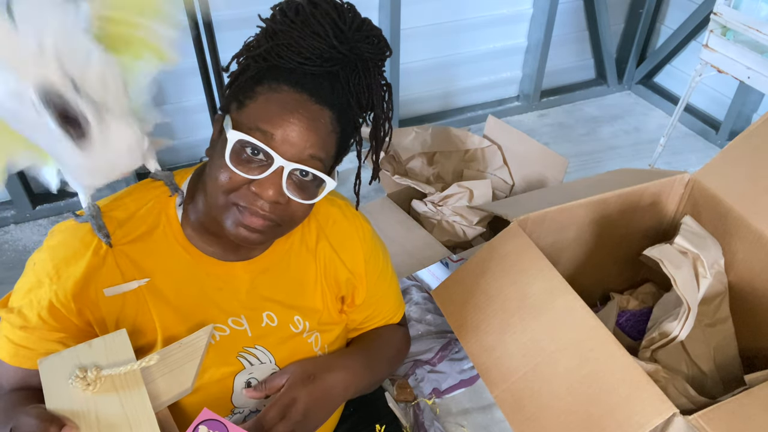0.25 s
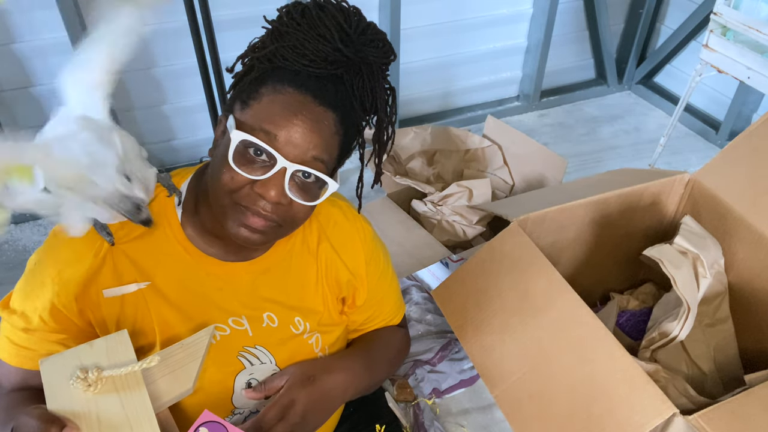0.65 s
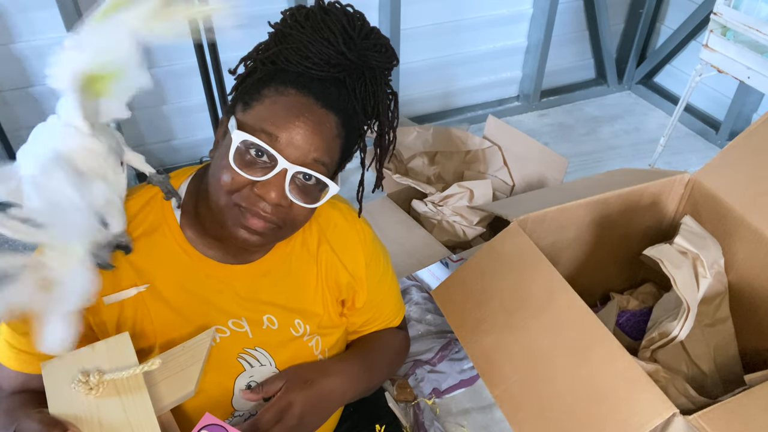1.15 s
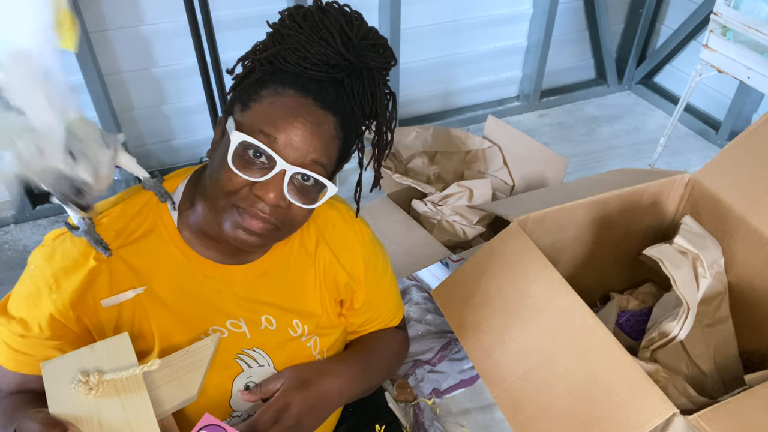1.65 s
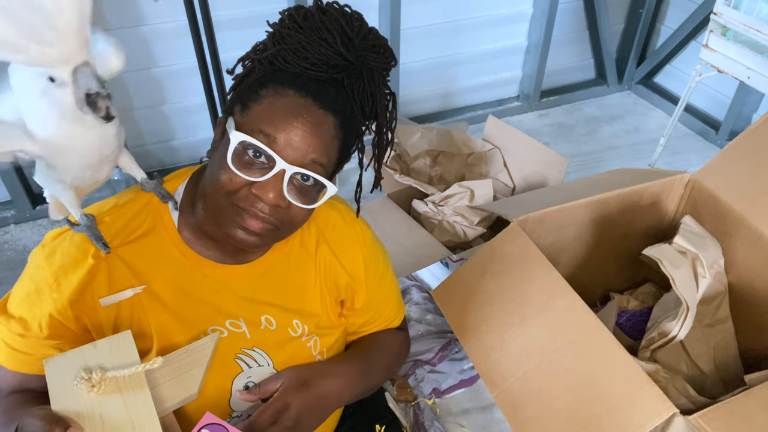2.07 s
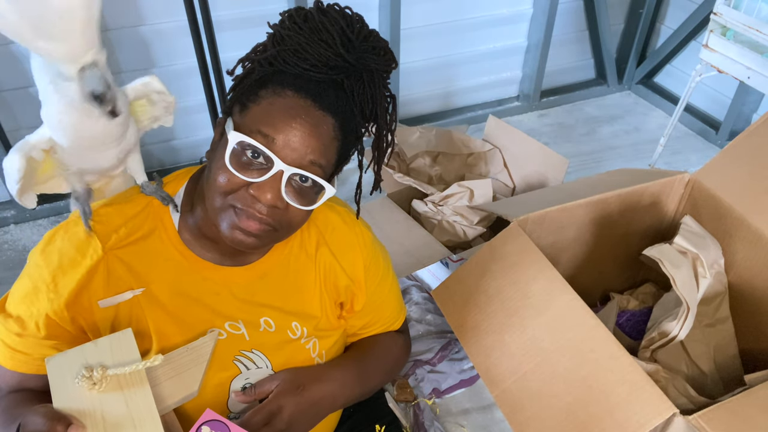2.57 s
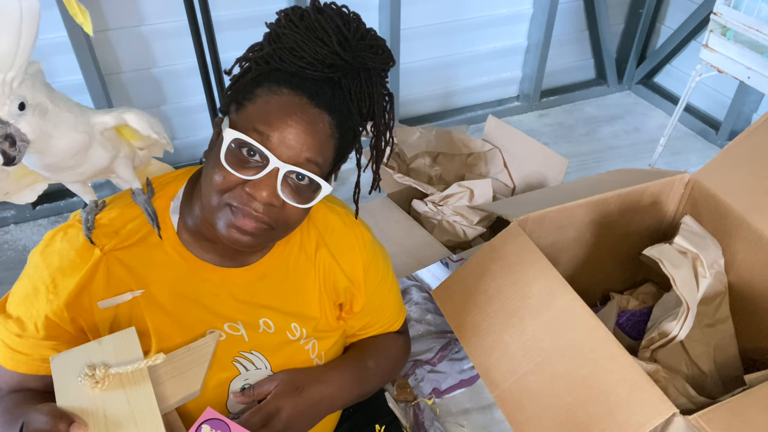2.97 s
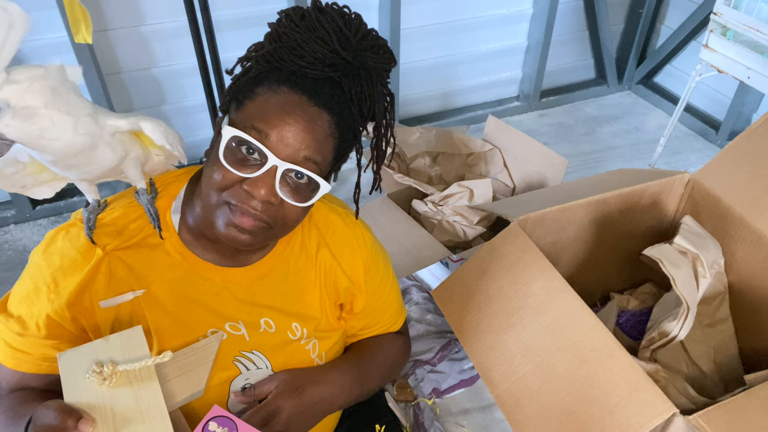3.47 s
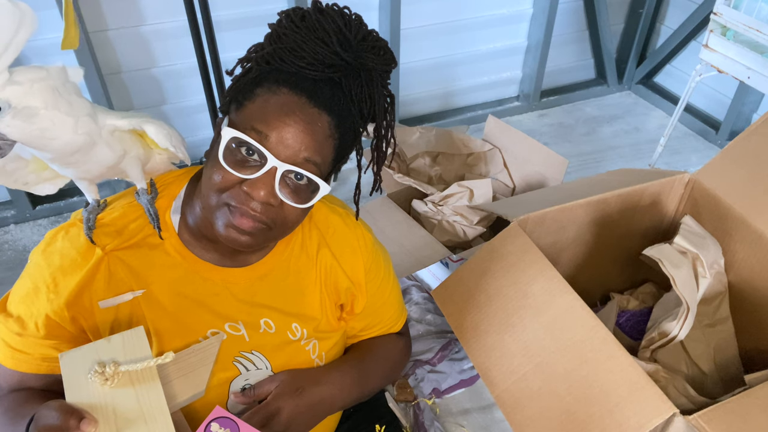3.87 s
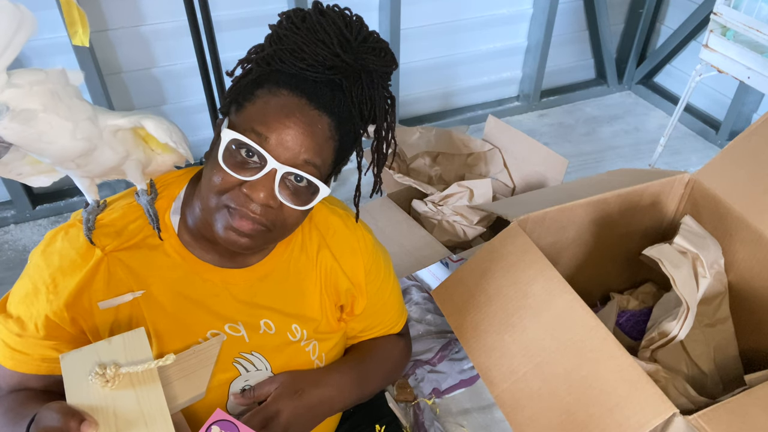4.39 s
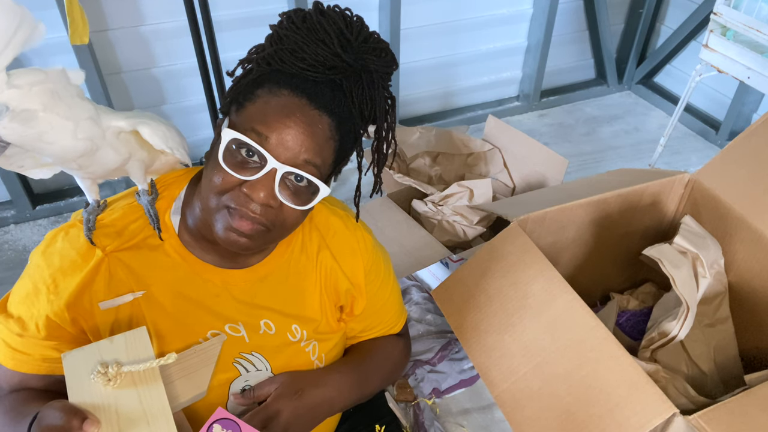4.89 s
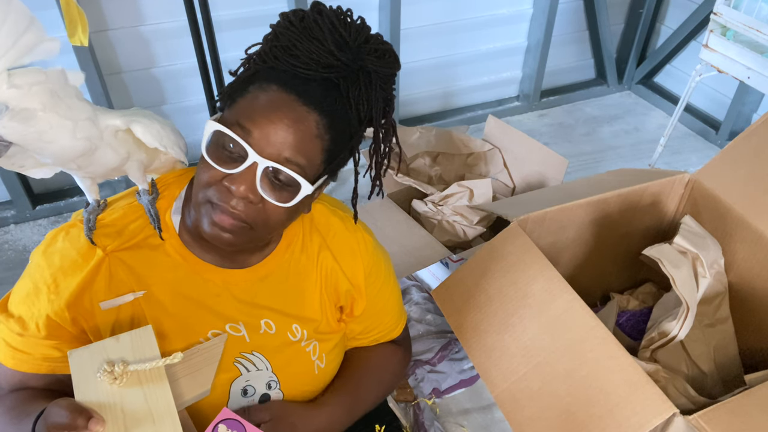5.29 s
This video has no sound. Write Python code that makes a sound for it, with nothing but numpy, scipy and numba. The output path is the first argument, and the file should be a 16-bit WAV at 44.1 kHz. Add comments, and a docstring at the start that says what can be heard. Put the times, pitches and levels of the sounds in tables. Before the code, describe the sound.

A big cockatoo close to the microphone beats its wings quickly for almost two seconds, with soft low thumps of air, rustling feathers and small snaps. One short whistle slips out, then five loud raspy screams follow with brief gaps, most breaking into a thin high whistle. The hard-walled room answers with dense short echoes; the loudest peaks distort, over a faint low hum.

```python
"""A large cockatoo screams five times close by in a hard-walled room, after flapping its wings and whistling once.
A scream starts as breath and turns into rough pulses near 1 kHz, at times with lines at half the pitch between.
Most screams end in a high, nearly pure whistle that flicks up or down to another pitch.
Wing beats are bursts of low air noise and rustling feathers; a faint hum lies under everything.
Early echoes and feedback delays make the room, and the loudest peaks are clipped."""
import sys
import numpy as np
from scipy import signal
from scipy.fft import rfft, irfft
from scipy.io import wavfile
from scipy.ndimage import uniform_filter1d, map_coordinates
from numba import njit

SR = 44100
rng = np.random.default_rng(int(sys.argv[2]) if len(sys.argv) > 2 else 0)


def waveform_to_disk(signal):
    """Save audio, clipped to [-1, 1], as 16-bit WAV at the path in sys.argv[1]."""
    frames = np.transpose(np.atleast_2d(signal))
    scaled = np.clip(frames, -1, 1) * 32767
    samples = np.round(scaled).astype(np.int16)
    wavfile.write(sys.argv[1], SR, samples)


N = 244225
T = np.arange(N) / SR


def undb(db):
    """Turn decibels into a gain."""
    return 10 ** (np.asarray(db) / 20)


def gain_at(shape, hz):
    """Gain of a table of (f/Hz, level/dB), almost silent outside its ends."""
    f, db = np.transpose(shape)
    return undb(np.interp(np.log(hz + 1), np.log(f), db, left=-90, right=-90))


def noise(shape):
    """Noise of a given colour, rms 1."""
    even = N + N % 2
    spectrum = rfft(rng.standard_normal(even))
    x = irfft(spectrum * gain_at(shape, np.fft.rfftfreq(even, 1 / SR)))[:N]
    return x / np.std(x)


def walk(rate):
    """Smooth random wandering that changes about rate times a second, spread 1."""
    k = int(SR / rate)
    x = uniform_filter1d(uniform_filter1d(rng.standard_normal(N), k), k)
    return x / np.std(x)


def play(tables, fade_s):
    """Columns of all tables over time, and a gate that is open while a table lasts."""
    s, *columns = np.transpose(np.concatenate(tables))
    gate = 0
    for t in tables:
        to_edge = np.minimum(T - t[0][0] + fade_s, t[-1][0] + fade_s - T)
        gate = gate + np.clip(to_edge / fade_s, 0, 1)
    return [np.interp(T, s, c) for c in columns], gate


def span(start, end, edge_s):
    """0 outside, 1 inside, with straight edges."""
    return np.clip(np.minimum(T - start, end - T) / edge_s, 0, 1)


def hump(s, length):
    """A smooth swell around s."""
    return np.exp(-(2 * (T - s) / length) ** 2)


def ring(hz, centre_hz, width_hz):
    """Bell-shaped resonance, 1 at the centre."""
    return 1 / (1 + (2 * (hz - centre_hz) / width_hz) ** 2)


def band(centre_hz, width_hz):
    """Noise around a centre that may move: two wandering levels on a cosine and a sine."""
    phase = 2 * np.pi * np.cumsum(centre_hz + 0 * T) / SR
    return walk(width_hz) * np.cos(phase) + walk(width_hz) * np.sin(phase)


# colour of the hum: f/Hz, level/dB
HUM_COLOUR = [(20, -21), (97, -1.5), (226, -15), (255, -13.5), (700, -29.5), (910, -86.5)]


def hum():
    """Steady low noise, partly shared by both ports and partly different in each."""
    return undb(-56) * (noise(HUM_COLOUR) + .5 * np.array([noise(HUM_COLOUR), noise(HUM_COLOUR)]))


BEAT_RISE_S, BEAT_FALL_S = 0.024, 0.1
FOLD_S, FOLD_FADE_S = 1.88, 0.4  # the wings come to rest
# wing beats: t/s, thump of air level/dB, rustle of feathers level/dB
WING_BEATS = [(.225, -45, -54.5), (0.365, -42, -48.5), (.45, -47, -50), (0.499, -43.5, -46),
              (.6, -46.5, -51), (0.753, -45, -46), (0.847, -42, -47), (1.022, -42, -54.5),
              (1.13, -54, -50.5), (1.28, -39.5, -48), (1.426, -45.5, -49), (1.554, -43, -50.5),
              (1.689, -42.5, -48.5)]


def beats(column, stir_db):
    """Quick rise and slower fall at each beat, over the steady stir of half-open wings."""
    power = undb(2 * stir_db)
    for row in WING_BEATS:
        t = T - row[0]
        shape = np.where(t < 0, np.exp(-(t / BEAT_RISE_S) ** 2), np.exp(-np.abs(t) / BEAT_FALL_S))
        power = power + (undb(row[column]) * shape) ** 2
    return np.sqrt(power) * np.clip(1 - (T - FOLD_S) / FOLD_FADE_S, 0, 1)


# colour of the pushed air: f/Hz, level/dB per Hz
AIR_COLOUR = [(20, -38), (48, 12.5), (98, 9), (295, 1.5), (392, -7), (700, -15.5), (910, -39.5)]
# colour of rustling and snapping feathers: f/Hz, level/dB per Hz
FEATHER_COLOUR = [(240, -10), (400, -4.5), (1000, -9.5), (2000, -9), (4500, -13.5), (7000, -14),
                  (9500, -20.5), (14500, -25), (15500, -88)]


def wings():
    """Beats push air, mostly alike at both ports; feathers rustle in fine grains and differ more."""
    push = beats(column=1, stir_db=-54.5) * undb(3.0 * walk(25))
    air = push * (noise(AIR_COLOUR) + 0.34 * np.array([noise(AIR_COLOUR), noise(AIR_COLOUR)]))
    grain = beats(column=2, stir_db=-54.5) * undb(0.98 * walk(100))
    near = grain * noise(FEATHER_COLOUR)
    wide = grain * np.array([noise(FEATHER_COLOUR), noise(FEATHER_COLOUR)])
    return near, air + 1.505 * wide


# short cracks: t/s, peak level/dB
FEATHER_SNAPS = [(0.4354, -28), (0.5901, -33), (0.8385, -25), (1.3897, -29)]


def snaps():
    """Short cracks of stiff feathers: noise that starts at once and dies within milliseconds."""
    size = sum(undb(db) * np.exp(-np.maximum(T - s, 0) / 0.0012) * (T >= s) for s, db in FEATHER_SNAPS)
    return noise(FEATHER_COLOUR) * size


# one duller rustle: t/s, length/s, level/dB
DULL_RUSTLE = (1.272, 0.11, -37)
# its colour: f/Hz, level/dB per Hz
DULL_RUSTLE_COLOUR = [(400, -17), (700, -1.5), (1500, 0), (2200, 5)]


def scuff():
    """A duller rustle: one swell of noise with an uneven level."""
    s, length, db = DULL_RUSTLE
    return undb(db + 2.8 * walk(56)) * hump(s, length) * noise(DULL_RUSTLE_COLOUR)


GLIDE_LOSS_DB = -13  # the whistle thins out in mid-glide
FLIP_WOBBLE = .016  # unsteadiness of the pitch in the other register, as a share
# flips to another register and back: start t/s, end t/s, f/Hz, level/dB, glide there/s, glide back/s
REGISTER_FLIPS = [(2.342, 2.377, 4312, -12.5, 0.0097, 0.0041), (2.383, 2.4, 3510, -1.5, 0.0071, .012),
                  (2.892, 2.938, 2824, -0.5, 0.01, 0.015), (3.005, 3.041, 4335, -20, 0.0047, .016),
                  (3.137, 3.183, 2896, -34, 0.0077, .01), (4.241, 4.3, 2886, -2.5, 0.0109, 0.0139),
                  (4.339, 4.398, 4850, -21, 0.01434, 0.014), (4.489, 4.515, 2826, -12.5, 0.0087, .01),
                  (5.144, 5.198, 5150, -11.5, 0.0083, 0.00806), (5.301, 5.397, 2915, -28, 0.0099, 0.013)]


def flips(hz, db):
    """Glide from the held pitch and level to those of each flip; the held pitch stays once it has sounded."""
    first_s = np.array([w[0][0] for w in WHISTLE_CURVES])
    wobble, away = 1 + FLIP_WOBBLE * walk(150), 0
    for start, end, to_hz, to_db, there_s, back_s in REGISTER_FLIPS:
        on = np.clip(np.minimum((T - start) / there_s, (end - T) / back_s), 0, 1)
        hz = hz + on * (to_hz * wobble - hz)
        db = db + np.sqrt(on) * (to_db - db) + GLIDE_LOSS_DB * np.sin(np.pi * on) ** 2
        already_sounding = start > first_s[np.searchsorted(first_s, end) - 1]
        away = np.maximum(away, on * already_sounding)
    return hz, db, away


PIPE_HZ, PIPE_WIDTH_HZ = 3750, 650  # windpipe resonance that carries the whistle
HELD_DB = -8  # the other side of the voice box keeps the held pitch through a flip
THROB_HZ, THROB = 85, .32  # mean rate of the uneven throb; its depth before the random swing
# held pitch, one curve a whistle: t/s, f/Hz, level/dB before the windpipe weakens it
WHISTLE_CURVES = [
    [(1.562, 3430, -20), (1.58, 3568, -13.5), (1.605, 3505, -13), (1.64, 3337, -18), (1.65, 3520, -28)],
    [(2.18, 3650, -10.5), (2.195, 3870, -4), (2.225, 3970, -4.5), (2.245, 3767, -18), (2.29, 3680, -8.5),
     (2.345, 3767, -5), (2.388, 3727, -21)],
    [(2.915, 3850, -8.5), (2.955, 3850, -10), (3.046, 3618, -10), (3.078, 3860, -9), (3.105, 3996, -9.5),
     (3.15, 3862, -11)],
    [(4.272, 3960, -17.5), (4.336, 3976, -13), (4.39, 3791, -6.5), (4.42, 3827, -13), (4.46, 3790, -13.5),
     (4.5, 3796, -28)],
    [(5.09, 3840, -21), (5.12, 3877, -18), (5.146, 3962, -13.5), (5.203, 3800, -11.5), (5.235, 3826, -18),
     (5.255, 3873, -12), (5.32, 3936, -9), (5.39, 3885, -26)],
]
# second to fourth multiple of the pitch: level/dB before they follow the loudness
OVERTONES = [-17.5, -38, -48.5]


def whistles():
    """A nearly pure tone with weak overtones; it fades as it flips away from the windpipe resonance."""
    (hz, db), gate = play(WHISTLE_CURVES, fade_s=0.0052)
    throb_phase = 2 * np.pi * np.cumsum(THROB_HZ * (1 + walk(30.3) / 4)) / SR
    throb = 1 + THROB * np.clip(.5 + walk(4), 0, 2) * np.sin(throb_phase)
    held = undb(db + HELD_DB) * np.sin(2 * np.pi * np.cumsum(hz) / SR)
    hz, db, away = flips(hz, db)
    phase = 2 * np.pi * np.cumsum(hz * (1 + 0.0028 * walk(120))) / SR
    pipe = 1 / np.sqrt(1 + ((hz - PIPE_HZ) / PIPE_WIDTH_HZ) ** 4)
    size = undb(db + 2.2 * walk(75)) * pipe * throb
    overtones = 0
    for k, overtone_db in enumerate(OVERTONES):
        # overtones grow faster than the tone itself
        growth = (1.87 * np.abs(size) * pipe) ** (k + 1)
        overtones = overtones + undb(overtone_db + 0.26 * walk(240)) * growth * np.sin((k + 2) * phase)
    return gate * (size * (np.sin(phase) + overtones) + away * throb * held)


HALF_AT_REST, TURN_S = 0.0094, 0.018  # half lines outside the stretches below; time to switch
BRIGHT_DB_PER_DB, NEUTRAL_DB = 0.29, -20.5  # louder is brighter: dB per octave for each dB; neutral level
LOW_HZ, LOW_WIDTH_HZ = 1109, 345  # low throat resonance
# voice of each scream: roughness 0-1, extra roughness of the breathy start, time until the start clears/s,
# fundamental against the scream level/dB, brightness/dB per octave, ring of the focus level/dB
SCREAM_VOICES = [(.2, .5, .06, -18, -1.5, 12.5), (0.67, 0.24, 0.12, -38, 0, 9.5),
                 (0.17, 0.75, 0.04177, -18, 0, 2.5), (.22, 0.3283, 0.021, -16, -1.5, 1),
                 (.28, 0.6207, 0.084, -32.5, 2, 6.5)]
# strong-weak cycles: start t/s, end t/s, half lines against whole lines, added roughness,
# swell of the lowest half line in the chest level/dB
STRONG_WEAK = [(1.913, 1.932, 1.4, -0.016, 13.5), (1.961, 2.019, 0.91, 0.085, -5),
               (2.028, 2.171, 0.33, 0.23, -2.5), (2.683, 2.83, 0.58, 0.1, 12),
               (3.515, 3.603, 1.05, 0.13, 14), (3.75, 3.892, 0.37, 0.045, 4.5),
               (4.04, 4.127, 0.34, 0.249, 15.5), (4.136, 4.248, 0.53, 0.25, -8),
               (4.779, 4.872, 0.29, 0.16, -19), (4.893, 5.007, 0.73, -0.094, 16)]
# moments when the fundamental blooms: t/s, length/s, peak level/dB
FUNDAMENTAL_BLOOMS = [(1.96, 0.043, -2.5), (2.161, 0.013, -19.5), (2.705, 0.057, -12), (2.822, 0.039, -13),
                      (4.163, 0.041, -18.5), (4.228, 0.052, -22), (4.893, 0.041, -14.5),
                      (5.005, 0.055, -19), (5.065, 0.045, -17)]


def voice_controls(hz, db):
    """Roughness, half lines, brightness, fundamental, ring of the focus, breathy start and chest swell."""
    starts = np.array([t[0][0] for t in SCREAM_CURVES])
    which = np.clip(np.searchsorted(starts, T + .03) - 1, 0, None)
    rough, breathy, clear_s, under_db, bright_db, focus_db = np.array(SCREAM_VOICES)[which].T
    opening = np.exp(-(np.maximum(T - starts[which], 0) / clear_s) ** 2)
    rough, half, chest_db = rough + breathy * opening, HALF_AT_REST, 0
    for start, end, share, extra, swell_db in STRONG_WEAK:
        on = span(start - TURN_S / 2, end + TURN_S / 2, TURN_S)
        half = half + share * on
        rough = rough + extra * on
        chest_db = chest_db + swell_db * on
    # the low throat resonance lifts the fundamental
    first = undb(db + under_db + 7.5 * ring(hz, LOW_HZ, LOW_WIDTH_HZ))
    first = first + sum(undb(peak_db) * hump(s, length) for s, length, peak_db in FUNDAMENTAL_BLOOMS)
    tilt_db = np.clip(bright_db + BRIGHT_DB_PER_DB * (db - NEUTRAL_DB), -8, 8)
    return np.clip(rough, 0, 1), np.clip(half, 0, None), tilt_db, first, focus_db, opening, chest_db


FOCUS_WIDTH_HZ = 300
# colour given by the throat: f/Hz, level/dB
THROAT_COLOUR = [(300, -41.5), (700, -19), (1100, -3), (1500, -3), (2100, 3.5), (3000, 1.5), (3800, -5.5),
                 (4400, -8), (5000, -11.5), (6500, -15.5), (8000, -23.5), (9800, -35), (12500, -46.5),
                 (14500, -37), (16000, -80)]


def pulses(hz, steady, shaken, rough, half, tilt_db, focus_hz, focus_db, chest_db):
    """Membrane pulses as sine lines at multiples of half the pitch, coloured by the throat."""
    stack, power = 0, 1e-9
    for k in range(1, 33):
        if k == 2:
            continue  # the fundamental is added in screams()
        line_hz = k * hz / 2
        size = gain_at(THROAT_COLOUR, line_hz) * undb(tilt_db * np.log2(k * hz / 5000))
        if k % 2:
            size = size * half
        lift_db = focus_db * ring(line_hz, focus_hz, FOCUS_WIDTH_HZ)
        if k == 1:
            lift_db = lift_db + chest_db
        else:
            lift_db = lift_db + (1.5 + 6 * rough) * walk(70)
        size = size * undb(lift_db)
        stack = stack + size * np.sin(k * (shaken if k > 1 else steady) + k * k)
        power = power + size ** 2 / 2
    # level out the sum, then let it flutter with the roughness
    return stack / np.sqrt(uniform_filter1d(power, 2000)) * undb(3.86 * rough * walk(410))


# low puff of the breathy start: f/Hz, level/dB per Hz
PUFF_COLOUR = [(250, -17.5), (500, -14), (1200, -1.5)]


def breath(shaken, tilt_db, focus_hz, focus_db, opening):
    """Air noise through the throat and its resonances, gently pulsed at the pitch."""
    raw = noise(THROAT_COLOUR)
    dull = signal.lfilter([.3], [1, -.7], raw)
    # brightness shifts the breath between its dull and its sharp part
    air = undb(-.7 * tilt_db) * dull + undb(2.0 * tilt_db) * (raw - dull)
    air = air / np.std(air)
    # the focus rings more in the breathy start
    focus_gain = undb(focus_db - 16.5) + opening * undb(-1)
    air = air + focus_gain * band(focus_hz, FOCUS_WIDTH_HZ)
    air = air + (1 - opening) * undb(-12) * band(LOW_HZ, LOW_WIDTH_HZ)
    air = air + opening * undb(-5.5) * noise(PUFF_COLOUR)
    return air / np.sqrt(uniform_filter1d(air ** 2, 2000)) * (1 + 0.085 * np.cos(2 * shaken))


# one curve a scream: t/s, f/Hz, level/dB
SCREAM_CURVES = [
    [(1.8, 829, -21.5), (1.84, 872.6, -29.5), (1.875, 916, -17.5), (1.89, 896.5, -11.5), (1.93, 1035, -6),
     (1.97, 1073, -9.5), (2.005, 1090, -8.5), (2.04, 999.5, -5), (2.1, 1007, -10), (2.17, 1081, -12),
     (2.195, 970, -15), (2.24, 957, -10), (2.3, 950, -58)],
    [(2.5, 837, -30), (2.53, 882.6, -24.5), (2.6, 966, -18), (2.64, 1039, -7.5), (2.7, 1082, -9.5),
     (2.76, 1031, -9), (2.82, 1042, -12), (2.86, 1040, -17), (2.92, 967, -20)],
    [(3.3, 750, -37.5), (3.345, 803, -25.5), (3.385, 874, -17.5), (3.41, 977, -22.5), (3.47, 910.6, -13),
     (3.505, 948.6, -14.5), (3.52, 1013, -13.5), (3.585, 1046, -16), (3.605, 896, -11.5), (3.65, 925, -11),
     (3.685, 871.6, -10), (3.715, 797, -16), (3.75, 786.8, -10), (3.82, 788, -19), (3.88, 781, -33.5)],
    [(3.93, 970, -30.5), (3.955, 1083, -14.5), (3.985, 1163, -10), (4.041, 1152, -10.5),
     (4.056, 1087, -7.5), (4.11, 1087, -9.5), (4.13, 1041, -14), (4.22, 1059, -17.5), (4.265, 1016, -19),
     (4.29, 1001, -29)],
    [(4.655, 914, -31.5), (4.745, 937.6, -31.5), (4.78, 945, -19), (4.82, 967.4, -22), (4.865, 1058, -16.5),
     (4.92, 1049, -21.5), (4.96, 1015, -18), (5.01, 1017, -18.5), (5.03, 1045, -18.5), (5.08, 979.5, -16.5),
     (5.13, 978, -19), (5.17, 1000, -25.5)],
]
# beak and tongue move the strongest throat resonance: t/s, f/Hz
THROAT_FOCUS = [(1.8, 2744), (1.88, 2806), (1.92, 3850), (2.18, 3697), (2.59, 3662), (2.645, 4200),
                (2.69, 2988), (2.81, 2944), (2.85, 2124), (3.3, 2900), (3.8, 3256), (3.95, 3254),
                (4.09, 3220), (4.66, 3010), (4.78, 2846), (4.83, 2830), (5.04, 3000)]


def screams():
    """Pulses, breath and a fundamental; roughness shakes the pulses and trades them for breath."""
    (hz, db), gate = play(SCREAM_CURVES, fade_s=0.002)
    rough, half, tilt_db, first, focus_db, opening, chest_db = voice_controls(hz, db)
    # phases run at half the pitch; uneven cycles smear the upper lines most
    steady = np.pi * np.cumsum(hz * (1 + 0.00643 * walk(64.0))) / SR
    shake = rough * (0.05194 * walk(486) + .04 * walk(130.0))
    shaken = steady + np.pi * np.cumsum(hz * shake) / SR
    focus_hz = np.interp(T, *np.transpose(THROAT_FOCUS))
    stack = pulses(hz, steady, shaken, rough, half, tilt_db, focus_hz, focus_db, chest_db)
    air = breath(shaken, tilt_db, focus_hz, focus_db, opening)
    fundamental = first * (1 - opening) * undb(10 * rough * walk(81)) * np.sin(steady + shaken)
    return gate * (undb(db) * (np.sqrt(1 - rough ** 2) * stack + rough * air) + fundamental)


# the bird sits to one side: f/Hz, lead of the left port/radians
PORT_LEADS = [(0, 0.057), (260, 1.4), (690, 1.32), (1290, 2.04), (4820, 7.54)]


def ports(x):
    """The bird sits to one side, so the left microphone port hears it first."""
    f, lead = np.transpose(PORT_LEADS)
    hz = np.fft.rfftfreq(N + 1, 1 / SR)
    lead = np.interp(hz, f, lead) + np.maximum(hz - f[-1], 0) * lead[-1] / f[-1]
    return irfft(rfft(x, N + 1) * np.exp(.5j * np.array([lead, -lead])), N + 1)[:, :N]


def echoes(x):
    """A dense spray of early echoes off shoulder, boxes and near wall, different at each port."""
    t = np.arange(4096) / SR
    spray = rng.standard_normal((2, 4096)) * np.exp(-t / 0.047) * (t > .002)
    spray = spray / np.sqrt(np.sum(spray ** 2, axis=1, keepdims=True))
    return undb(0.5) * signal.fftconvolve(x[None], spray, axes=1)[:, :N]


@njit
def walls(x, lags, gain, damp):
    """Eight delay lines that feed each other, duller on every round."""
    line, soft, out = np.zeros((8, 4096)), np.zeros(8), np.zeros((2, len(x)))
    for i in range(len(x)):
        total = 0.
        for k in range(8):
            soft[k] += (1 - damp) * (gain[k] * line[k, (i - lags[k]) & 4095] - soft[k])
            total += soft[k]
            out[k % 2, i] += soft[k]
        for k in range(8):
            line[k, i & 4095] = x[i] + soft[k] - total / 4
    return out


ROOM_T60_S, ROOM_DAMP, ROOM_DB = 0.5, 0.012, -15.5  # fall by 60 dB before damping; damping; level
SWAY_S = .00005  # typical change of the path to the walls


def room(voice):
    """The walls ring on; the head sways, so the path to them keeps changing."""
    lags = np.array([563, 727, 911, 1117, 1327, 1559, 1801, 2069])  # samples
    sway = map_coordinates(voice, [np.arange(N) + SWAY_S * SR * walk(25)], mode="mirror")
    # the tiny offset keeps the delay lines from slowing down on near-zero numbers
    return undb(ROOM_DB) * walls(sway + 1e-18, lags, undb(-60 * lags / SR / ROOM_T60_S), ROOM_DAMP)


def scene():
    """The bird at both ports, with the room, the moving air and the hum."""
    low_hum = hum()
    rustle, air = wings()
    cracks = snaps()
    dull_rustle = scuff()
    voice = whistles() + screams()
    direct = ports(voice + rustle + dull_rustle + cracks)
    return direct + echoes(voice) + room(voice) + air + low_hum


def record(dry):
    """The converter clips the loudest peaks at full scale; a steep filter cuts the top above 15.7 kHz."""
    top_cut = signal.ellip(8, .2, 60, 15700, fs=SR, output="sos")
    return signal.sosfilt(top_cut, np.clip(dry, -1, 1))


dry = scene()
out = record(dry)
waveform_to_disk(out)
```